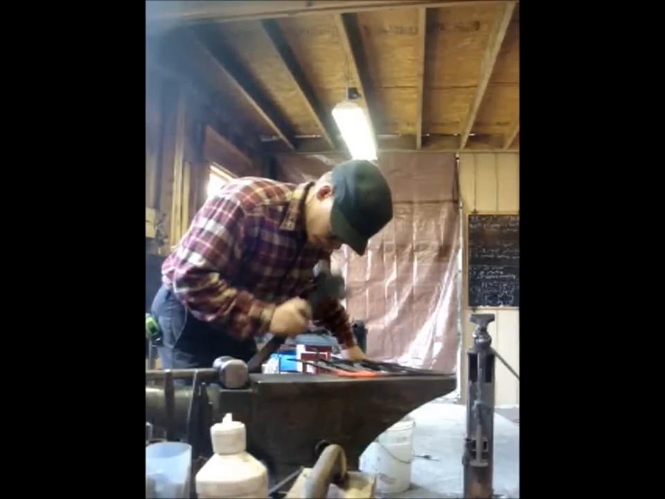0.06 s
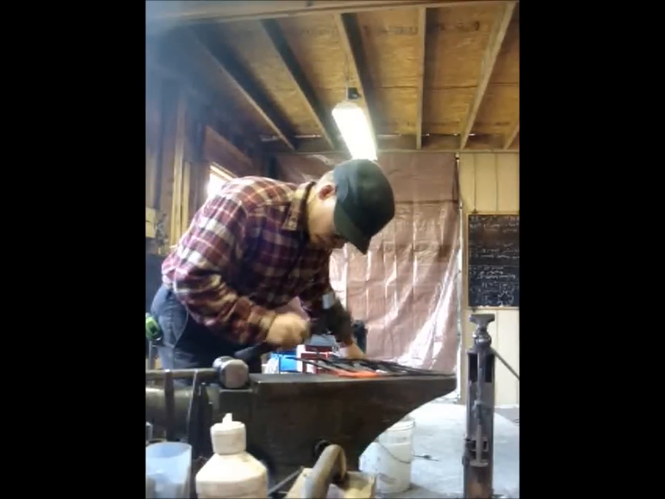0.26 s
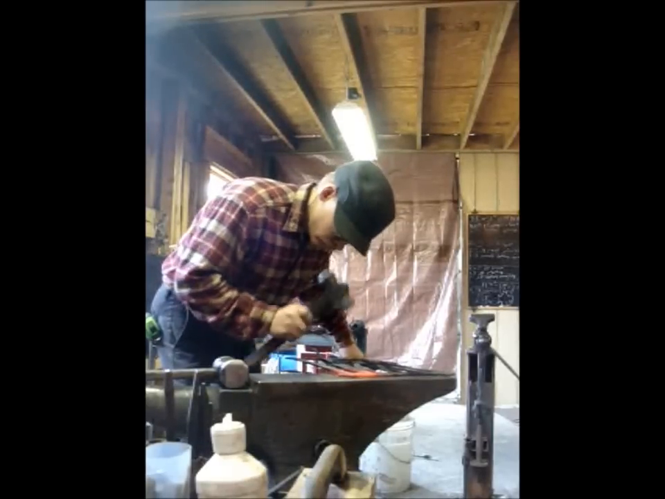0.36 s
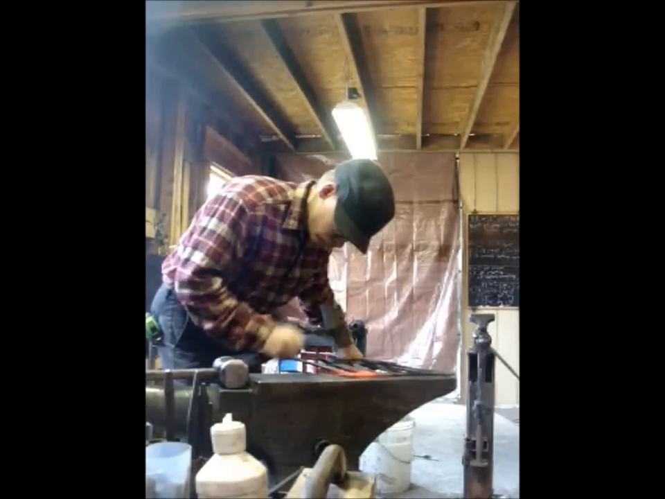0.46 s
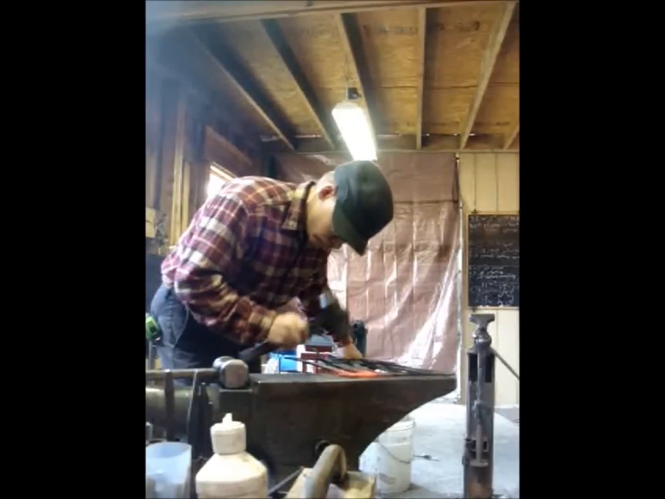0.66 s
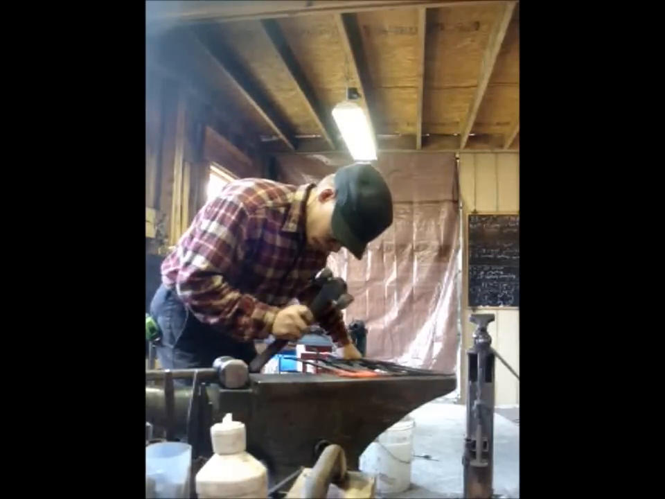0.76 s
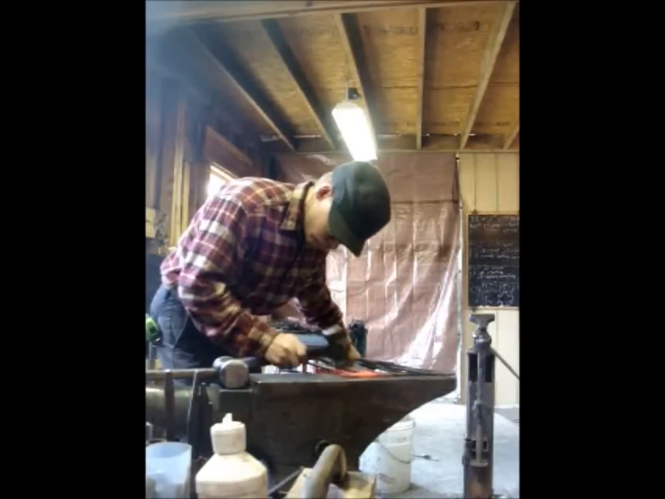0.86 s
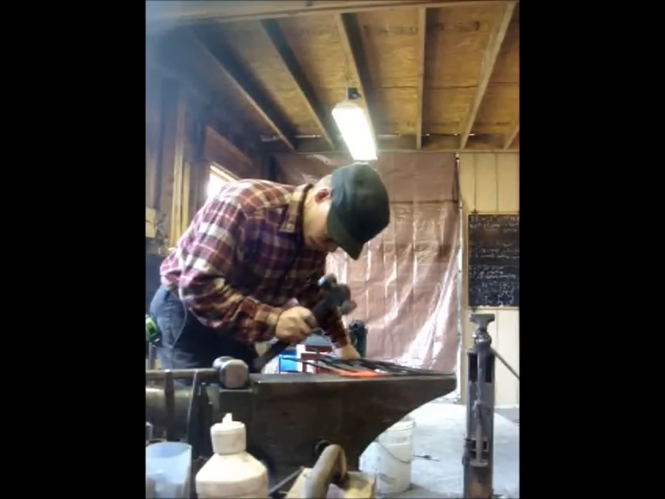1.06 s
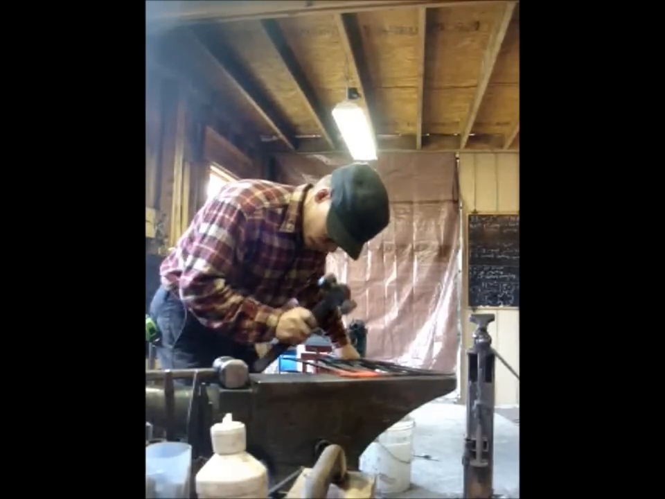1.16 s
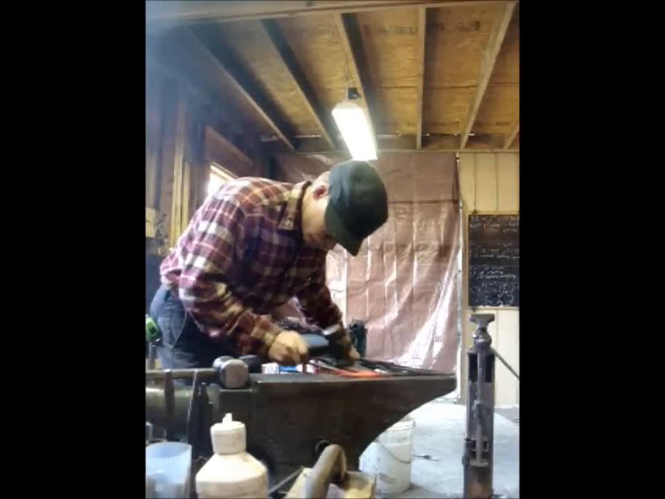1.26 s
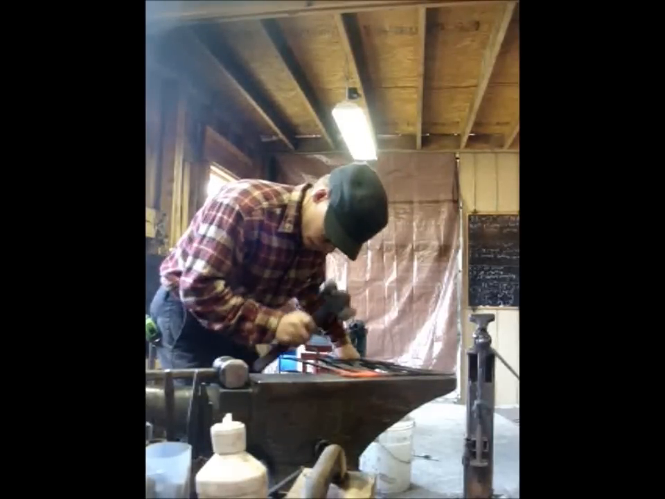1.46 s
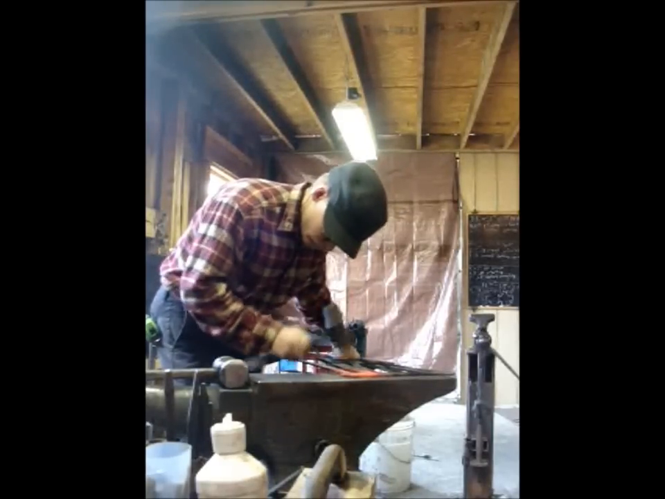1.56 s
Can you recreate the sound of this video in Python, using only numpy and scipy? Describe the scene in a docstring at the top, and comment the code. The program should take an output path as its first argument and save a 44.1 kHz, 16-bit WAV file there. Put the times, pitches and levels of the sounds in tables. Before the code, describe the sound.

Four hard, evenly spaced hammer blows on an anvil, with short room echo over low hum

```python
"""A smith's hammer lands four times on hot iron on an anvil in a wooden workshop.
Each blow is a band-coloured click plus decaying anvil and hammer modes, carried on by a diffuse room tail.
Behind it: hum of motor and lamps as wandering sines, over patchy band noise.
The recorder's gain control ducks the background after every blow; the microphone's rest point jumps."""
import sys
import numpy as np
from scipy import signal
from scipy.io import wavfile

SR = 44100
rng = np.random.default_rng(int(sys.argv[2]) if len(sys.argv) > 2 else 0)


def wrap_up_sound(samples):
    """Save the sound to the file named by the first command line argument, as 16-bit audio."""
    columns = np.atleast_2d(samples).T
    # keep every value between -1 and 1, then stretch to whole-number steps
    tamed = np.clip(columns, -1, 1)
    steps = np.round(tamed * 32767).astype(np.int16)
    wavfile.write(sys.argv[1], SR, steps)


def convert_level_to_amplitude(level_db):
    """Map a level in decibels to its linear amplitude factor."""
    exponent = np.asarray(level_db, float) / 20
    return 10 ** exponent


N = 70560

# hammer blows: start_s, strength_db, crack_re_ring_db, crack_tilt_db_per_octave, core_modes_extra_db,
# rest_point_jump_db
BLOWS = [(0.2057, -11, 4.5, 0.14, -4.5, -28.5), (0.5606, -10, 1.55, -2, -4, -32),
         (0.9287, -7, 2, 1, 3, -28), (1.2828, -8.5, 4, 1.4, -1.5, -31.5)]


def rms_one(x):
    """Scale to unit rms."""
    return x / np.sqrt(np.mean(x ** 2) + 1e-20)


def at_hz(points, hz):
    """Read a two-column table on a log-frequency axis."""
    table_hz, values = np.transpose(points)
    return np.interp(np.log(hz), np.log(table_hz), values)


def one_pole(x, time_s):
    """Exponential smoothing."""
    r = np.exp(-1 / (time_s * SR))
    return signal.lfilter([1 - r], [1, -r], x)


def drift(rate_hz):
    """Slow random curve of unit rms: noise through two equal poles, computed every 40 samples."""
    step = 40
    r = np.exp(-2 * np.pi * rate_hz * step / SR)
    noise = rng.standard_normal(N // step + 2002)
    slow = signal.lfilter([1], [1, -2 * r, r * r], noise)[2000:]  # skip the filter's start
    return np.interp(np.arange(N) / step, np.arange(len(slow)), rms_one(slow - slow.mean()))


def bands(count, source=None):
    """Third-octave bands of a source, or of two alternating white noises: (centre Hz, signal) pairs."""
    edges_hz = 28 * 2 ** np.arange(0, 8.8, 1 / 3)
    sources = rng.standard_normal((2, count)) if source is None else [source, source]
    for k, (low_hz, high_hz) in enumerate(zip(edges_hz, edges_hz[1:])):
        band_pass = signal.butter(2, [low_hz, high_hz], "band", fs=SR, output="sos")
        yield np.sqrt(low_hz * high_hz), signal.sosfilt(band_pass, sources[k % 2])


def motor_and_lamp_hum():
    """Steady sine lines, each with a level that wanders in dB."""
    # hum lines: pitch_hz, level_db_rms, wander_db
    hum_lines = [(119, -56, 0.5), (136, -53, -1), (274.2, -49, 1.5), (575.3, -52.5, 4.8)]
    t = np.arange(N) / SR
    hum = np.zeros(N)
    for hz, level_db, wander_db in hum_lines:
        gain = convert_level_to_amplitude(level_db + wander_db * drift(13))
        hum += gain * np.sqrt(2) * np.sin(2 * np.pi * (hz * t + rng.random()))
    return hum


def workshop_noise():
    """Coloured noise, patchy because each band's level drifts on its own."""
    # noise spectrum before scaling to unit rms: band_hz, relative_db_per_hz
    spectrum = [(25, -29), (60, -20.5), (95, -41), (170, -20.5), (230, -18.5), (320, -8.5), (480, -14.5),
                (700, -17), (1400, -20.5), (2300, -23), (3400, -28), (4500, -26.5), (7000, -42),
                (10300, -44.5)]
    level_db, patchy_db, patch_rate_hz = -41, 2.5, 1.67
    noise = np.zeros(N)
    for hz, band in bands(N):
        noise += convert_level_to_amplitude(at_hz(spectrum, hz) + patchy_db * drift(patch_rate_hz)) * band
    return convert_level_to_amplitude(level_db) * rms_one(noise)


def rest_point_jumps():
    """Each blow pushes the microphone briefly up, then knocks its rest point down; it creeps back."""
    push_s, push_re_jump_db = 0.0013, -5.5
    return_s, return_curve, dc_block_hz = 0.025, 1.4, 0.8
    jump_s = np.array([row[0] + push_s for row in BLOWS])
    jump_db = np.array([row[5] for row in BLOWS])
    since_s = np.arange(N) / SR - jump_s[:, None]
    push = convert_level_to_amplitude(push_re_jump_db) * (since_s > -push_s) * (since_s < 0)
    knock = (since_s >= 0) * np.exp(-(np.abs(since_s) / return_s) ** return_curve)
    jumps = convert_level_to_amplitude(jump_db) @ (push - knock)
    return jumps - one_pole(jumps, 1 / (2 * np.pi * dc_block_hz))


def workshop(x):
    """Direct sound plus a newly drawn diffuse tail: quick build-up, hold, early clumps, decay by band."""
    # reverberation: band_hz, t60_s
    reverberation = [(400, 0.31), (650, 0.48), (1000, 0.55), (2800, 0.45), (5000, 0.47), (10000, 0.34)]
    tail_re_direct_db, build_up_s, hold_s = 12, 0.0013, 0.0083
    clump_db, clump_rate_hz, clump_fade_s = 3.5, 91, 0.098
    t = np.arange(SR * 3 // 4) / SR
    tail = np.zeros(len(t))
    for hz, band in bands(len(t)):
        tail += band * convert_level_to_amplitude(-60 * np.maximum(t - hold_s, 0) / at_hz(reverberation, hz))
    tail *= 1 - np.exp(-t / build_up_s)
    tail *= convert_level_to_amplitude(clump_db * np.exp(-t / clump_fade_s) * drift(clump_rate_hz)[:len(t)])
    tail /= np.sqrt(np.sum(tail ** 2))
    return x + convert_level_to_amplitude(tail_re_direct_db) * signal.fftconvolve(x, tail)[:len(x)]


def hammer():
    """Blows: coloured clicks, each with its own random room tail, and decaying modes sharing one tail."""
    # anvil and hammer modes: pitch_hz, relative_level_db, t60_s
    modes = [(1090, -18, 0.046), (1407, -18.5, 0.039), (1827, -5.5, 0.037), (2037, -9, 0.057),
             (2285, 0, 0.032), (2475, -13, 0.072), (2572, -5.5, 0.085), (2695, -6.5, 0.044),
             (2792, -2.5, 0.038), (3072, -1, 0.03), (4063, -6, 0.02), (4534, -4.5, 0.031),
             (5176, -4, 0.013), (6388, -16.5, 0.14)]
    # crack colour: band_hz, relative_db_per_hz
    crack_colour = [(240, -50.5), (400, -17.5), (1400, -6.5), (1670, -8.5), (1760, -9), (2370, -12),
                    (2650, -12.5), (3330, -9), (6230, -8), (10300, -16), (13400, -51), (22000, -120)]
    crack_gain_db, crack_low_cut_hz = 23.5, 390
    ring_gain_db, ring_scatter_db = -5.5, 1.5
    core_hz, core_octaves = 2800, 0.22
    t = np.arange(SR) / SR
    cracks, ring = np.zeros(N + SR), np.zeros(N + SR)
    low_cut = signal.butter(2, crack_low_cut_hz, "high", fs=SR, output="sos")
    click = signal.sosfilt(low_cut, (t == 0) + 1e-18)
    click_bands = list(bands(SR, click))
    for start_s, strength_db, crack_db, tilt, core_db, _ in BLOWS:
        i = int(start_s * SR)
        crack = np.zeros(SR)
        for k, (hz, band) in enumerate(click_bands):
            colour_db = at_hz(crack_colour, hz) + tilt * np.log2(hz / core_hz)
            crack += (-1) ** k * convert_level_to_amplitude(colour_db) * band  # polarity alternates
        cracks[i:i + SR] += convert_level_to_amplitude(strength_db + crack_gain_db + crack_db) * workshop(crack)
        luck = rng.standard_normal(len(modes))
        for k, (hz, mode_db, t60_s) in enumerate(modes):
            core = np.exp(-(np.log2(hz / core_hz) / core_octaves) ** 2)
            level_db = strength_db + ring_gain_db + mode_db + core_db * core + ring_scatter_db * luck[k]
            ring[i:i + SR] += (-1) ** k * convert_level_to_amplitude(level_db - 60 * t / t60_s) * np.sin(2 * np.pi * hz * t)
    return (cracks + workshop(ring))[:N]


def gain_loss_db(x, threshold_db, squeeze, attack_s, held_fall_db_per_s, smooth_s):
    """Gain control: loss is a share of the peak-held level above the threshold, smoothed."""
    fall_db = held_fall_db_per_s * np.arange(N) / SR
    level_db = 10 * np.log10(one_pole(x ** 2, smooth_s) + 1e-12)
    held_db = np.maximum.accumulate(level_db + fall_db) - fall_db
    return one_pole(squeeze * np.maximum(held_db - threshold_db, 0), attack_s)


def scene():
    """Hammer over hum and noise, one channel."""
    return (hammer() + motor_and_lamp_hum() + workshop_noise())[None]


def low_pass(x):
    """Removes everything above the highest recorded frequency."""
    return signal.sosfilt(signal.butter(12, 11200, fs=SR, output="sos"), x)


def record(dry):
    """Quick and slow gain control, rounded peaks, rest-point jumps, steep top cut."""
    look_ahead_s, ceiling, top_cut_hz = 0.0012, 0.4, 10073
    quick_db = gain_loss_db(dry[0], threshold_db=-24, squeeze=0.4, attack_s=0.0013,
                            held_fall_db_per_s=54.5, smooth_s=0.006)
    quick_db = np.interp(np.arange(N) + look_ahead_s * SR, np.arange(N), quick_db)
    slow_db = gain_loss_db(dry[0], threshold_db=-15, squeeze=0.6, attack_s=0.6,
                           held_fall_db_per_s=1.5, smooth_s=0.023)
    ducked = dry * convert_level_to_amplitude(-quick_db - slow_db)
    mix = ceiling * np.tanh(ducked / ceiling) + rest_point_jumps()
    top_cut = signal.ellip(10, 0.5, 40, top_cut_hz, fs=SR, output="sos")
    mix = signal.sosfilt(top_cut, mix)
    return low_pass(mix)


dry = scene()
out = record(dry)
wrap_up_sound(out)
```